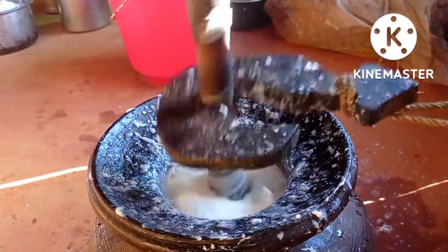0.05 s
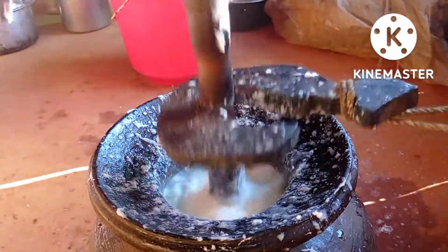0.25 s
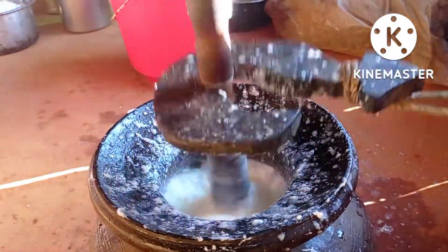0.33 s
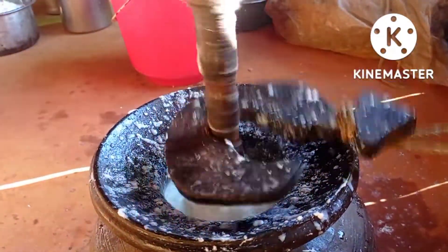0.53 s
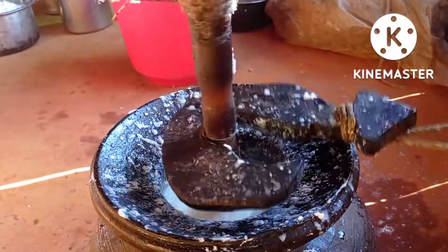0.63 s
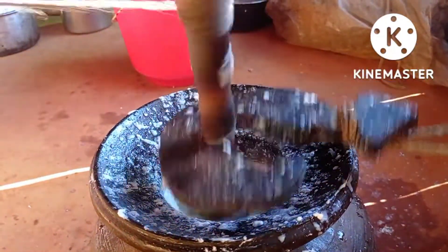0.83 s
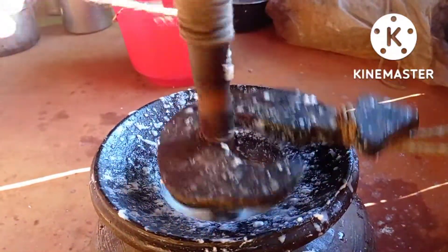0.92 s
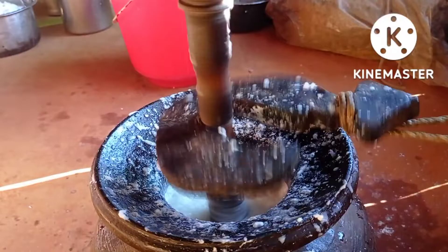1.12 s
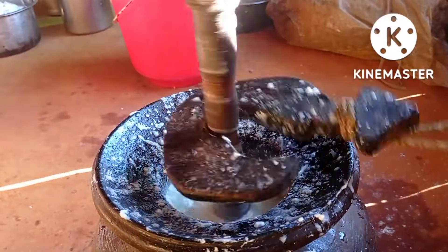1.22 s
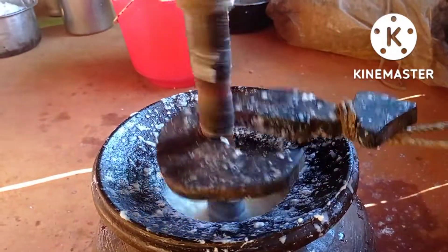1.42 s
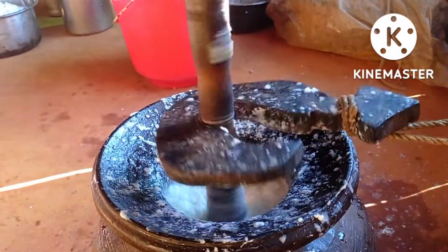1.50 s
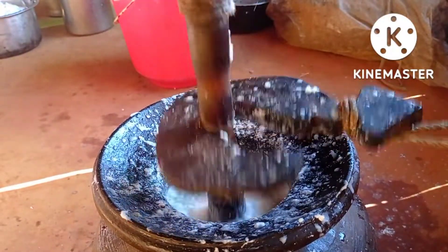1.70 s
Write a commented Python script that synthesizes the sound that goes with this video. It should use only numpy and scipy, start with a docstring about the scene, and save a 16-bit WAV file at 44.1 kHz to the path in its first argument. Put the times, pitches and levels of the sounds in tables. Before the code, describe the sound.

Thick liquid sloshing and gurgling as a wooden rod churns it, with occasional wooden knocks.

```python
"""Churning in a small room

One microphone, close to a pot where a wooden rod, spun to and fro by a rope, whips thick liquid.
Each stroke gurgles and hisses, throws liquid against the wall and leaves fat bubbles that plop.
The rod scrapes and knocks in its wooden guide; behind it the room answers briefly."""
import sys
import numpy as np
from scipy import signal
from scipy.io import wavfile
from scipy.ndimage import uniform_filter1d

SR = 44100
rng = np.random.default_rng(int(sys.argv[2]) if len(sys.argv) > 2 else 0)


def waveform_to_disk(signal):
    """Save audio, clipped to [-1, 1], as 16-bit WAV at the path in sys.argv[1]."""
    frames = np.transpose(np.atleast_2d(signal))
    scaled = np.clip(frames, -1, 1) * 32767
    samples = np.round(scaled).astype(np.int16)
    wavfile.write(sys.argv[1], SR, samples)


N = 77175
T = np.arange(N) / SR


# The effort of the strokes. Each row: time in seconds, level in dB.
CHURN_LEVEL = [(0, -44), (.04, -53), (.10, -52), (.18, -47.5), (.225, -43), (.29, -42.5), (.43, -47),
               (.51, -43.5), (.6, -43.5), (.745, -42.5), (.80, -50.5), (.86, -47), (.92, -41), (1.0, -37),
               (1.07, -40), (1.14, -48.5), (1.175, -51.5), (1.20, -44.5), (1.30, -43), (1.36, -34.5),
               (1.42, -43.5), (1.485, -41), (1.54, -56), (1.64, -45.5), (1.75, -41)]
# The gurgle from close by. Each row: frequency in Hz, relative gain in dB.
GURGLE_SPECTRUM = [(100, -45.5), (250, -17.5), (430, 0), (750, 0), (1000, -6), (1300, -17.5), (1800, -12.5),
                   (2600, -32), (6000, -33)]

def gurgle(per_s=900, spread_db=2.0, decay_cycles=1.37, sizes=24):
    """The paddle folds in many small, heavily damped bubbles, each size with its own pitch."""
    births = clicks(per_s, spread_db)
    size_index = rng.integers(0, sizes, N)
    out = np.zeros(N)
    for k, hz in enumerate(np.geomspace(250, 2200, sizes)):
        grain = bubble(hz, decay_cycles / hz) * (hz / 1000)
        out += signal.oaconvolve(births * (size_index == k), grain)[:N]
    return colour(out, GURGLE_SPECTRUM) * level(CHURN_LEVEL)


# Liquid thrown at the wall. Each row: start and length in seconds, slap and spray levels in dB.
SLOSHES = [(0.205, 0.03, -40.5, -53), (0.524, 0.0095, -37, -52), (.537, .016, -35, -43),
           (0.55, 0.014, -31, -32.5), (0.569, 0.023, -30.5, -33), (.591, 0.0072, -27, -29),
           (0.603, 0.0085, -29.5, -31), (0.623, 0.0062, -32, -40), (.644, 0.014, -26.5, -45),
           (0.933, 0.016, -43, -69), (1.02, .01, -37, -47.5), (1.3232, .012, -43.5, -41),
           (1.346, 0.027, -36, -54), (1.449, 0.0073, -34.5, -49), (1.473, 0.012, -40.5, -58)]
# The low slap and the bright spray. Each row: frequency in Hz, relative gain in dB.
SLAP_SPECTRUM = [(60, -21.5), (200, -9.5), (480, 6), (800, 5.5), (1300, -5), (1800, -4.5), (2300, -11.5),
                 (2600, -14.5), (3400, -23), (6000, -52)]
SPRAY_SPECTRUM = [(500, -12.5), (1500, -14), (2200, 9.5), (2600, -3), (3400, -0.5), (4700, -2), (6700, 0.5),
                  (8200, -10), (11000, -23.5), (13500, -35), (15200, -19)]
# The pot's ring. Each row: frequency in Hz, relative level in dB, seconds to fall 60 dB.
POT_MODES = [(490, -23, .12), (740, -17, .12), (945, -34, .1), (1766, 7, 0.1), (2240, -10, .14),
             (2790, -19, 0.14), (3580, 1, 0.18), (4930, 0, .1), (5820, -24, 0.09)]

def sloshes(rise_s=0.0035, fall_s=0.0087, ring_db=-48, dull_hz=7000, full_spray_db=-32):
    """Sheets of liquid slap the wall and break into drops, finer when thrown hard; the pot rings."""
    slap_env, spray_env = np.zeros((2, N))
    for start, length, slap_db, spray_db in SLOSHES:
        env = swell(start, rise_s, length, fall_s)
        slap_env = np.hypot(slap_env, env * amp(slap_db))
        spray_env = np.hypot(spray_env, env * amp(spray_db))
    drops = colour(clicks(per_s=7000, spread_db=2.0), SPRAY_SPECTRUM)
    coarse = signal.sosfiltfilt(signal.butter(2, dull_hz, fs=SR, output="sos"), drops)
    fineness = np.minimum(spray_env / amp(full_spray_db), 1) ** 2
    spray = spray_env * (coarse + fineness * (drops - coarse))
    slap = slap_env * colour(clicks(per_s=3000, spread_db=1), SLAP_SPECTRUM)
    splash = slap + spray
    return splash + amp(ring_db) * signal.fftconvolve(splash, ring(POT_MODES))[:N]


# Bubbles and drops. Each row: start in seconds, pitch in Hz, peak in dB, decay in seconds.
PLOPS = [(.001, 662, -33, 0.0021), (.062, 890, -39.5, 0.0021), (.123, 650, -50, 0.0051),
         (0.1553, 874, -34.5, 0.0012), (.198, 650, -38, 0.0016), (.341, 5470, -42.5, 0.0015),
         (.375, 770, -34, 0.0021), (.4665, 777, -31, 0.0011), (.5535, 4560, -30, 0.00046),
         (.561, 4500, -23, 0.00051), (.578, 680, -41, 0.0008), (.594, 858, -17.5, 0.0013),
         (.5975, 4600, -30, 0.001), (.695, 156, -34.5, 0.011), (.751, 630, -29, 0.0017),
         (.907, 894, -32, 0.0025), (.916, 810, -31, 0.00087), (.9215, 735, -22.5, .0012),
         (.935, 1160, -24.5, 0.00065), (.999, 850, -23, 0.00092), (1.0075, 670, -28, 0.0021),
         (1.186, 656, -35, 0.0013), (1.33, 166, -44.5, 0.013), (1.336, 560, -23, 0.0017),
         (1.365, 695, -21, 0.0017), (1.3775, 1030, -18.5, 0.00082), (1.448, 790, -24, 0.0027),
         (1.459, 650, -27.5, 0.0024), (1.625, 612, -36.5, 0.0027), (1.692, 4040, -37.5, 0.0011),
         (1.699, 706, -39, 0.0017), (1.716, 647, -30.5, 0.0012)]

def plops():
    """Single bubbles burst in the thick liquid, the largest with the lowest note."""
    out = np.zeros(N)
    for start, hz, db, decay_s in PLOPS:
        add(out, start, amp(db) * bubble(hz, decay_s))
    return out


# The paddle meets the surface. Each row: start in seconds, relative level in dB.
SMACKS = [(0.5525, -3.5), (1.0296, -4.5), (1.3254, -5), (1.4477, -3.5)]
# The tone of a smack. Each row: frequency in Hz, relative gain in dB.
SMACK_SPECTRUM = [(100, -7.5), (450, 2), (800, 6.5), (1200, -12), (1650, 6), (2500, -13.5), (2850, 0),
                  (3500, -22), (4700, -18), (7000, -20), (9000, -54), (13000, -57)]

def smacks(average_db=-50, decay_s=0.0026):
    """The paddle lands flat and wet: a sudden burst that dies in a few milliseconds."""
    env, t = np.zeros(N), T[:SR // 20]
    for start, db in SMACKS:
        add(env, start, amp(db) * np.exp(-t / decay_s))
    return amp(average_db) * colour(env * rng.standard_normal(N), SMACK_SPECTRUM)


# Bumps at the guide. Each row: start in seconds, gain in dB, thud pitch in Hz.
KNOCKS = [(0.3093, -19, 462), (.3180, -26.5, 316), (.6930, -22, 340), (0.7084, -37, 263),
          (1.0221, -14.5, 475), (1.0286, -10, 574), (1.061, -33, 283)]
# Pot and rod ringing. Each row: frequency in Hz, relative level in dB, seconds to fall 60 dB.
KNOCK_MODES = [(106, -28, 0.44), (149, -32.5, 0.068), (272, -15, 0.11), (479.6, -8.5, .07),
               (650, -22.5, .07), (984, -18, 0.11), (1790, -19.5, 0.027), (1940, -37, 0.064),
               (2170, -30.5, 0.063), (2300, -30, .08), (2720, -27, 0.028)]

def knocks(thud_db=-3, thud_s=0.0021, contact_s=0.00026):
    """The rod bumps its guide: a dull thud and a short wooden ring, softened by the wet contact."""
    out = np.zeros(N)
    for start, db, hz in KNOCKS:
        blow = ring(KNOCK_MODES)
        add(blow, 0, amp(thud_db) * bubble(hz, thud_s, glide_per_s=0))
        onset = 1 - np.exp(-T[:len(blow)] / contact_s)
        add(out, start, amp(db) * blow * onset)
    return high_pass(out, hz=92)


# The low surge in the pot. Each row: time in seconds, level in dB.
HEAVE_LEVEL = [(0, -48), (.1, -53.5), (.25, -46.5), (.36, -46.5), (.51, -57), (.58, -42), (.71, -41),
               (.85, -62.5), (.98, -48.5), (1.05, -38), (1.2, -69.5), (1.3, -53.5), (1.37, -48.5),
               (1.47, -49), (1.54, -66.5), (1.75, -47.5)]
# Its weight at close range. Each row: frequency in Hz, relative gain in dB.
HEAVE_SPECTRUM = [(20, -52), (38, -35), (52, -2), (80, -6), (108, 4.5), (160, 0.5), (270, -2), (400, -2),
                  (900, -57)]

def heave():
    """The mass of liquid shoves the pot."""
    return colour(clicks(per_s=1500, spread_db=7), HEAVE_SPECTRUM) * level(HEAVE_LEVEL)


# Resonances of the rod in its guide. Each row: frequency and width in Hz, relative level in dB.
SCRAPE_MODES = [(1122, 42, 0.5), (1474, 82, -2.5), (2093, 130, 3.5), (2230, 92, -8), (3410, 390, -3.5)]
SCRAPE_START_S, SCRAPE_RISE_S = 0.181, 0.053

def scrape(peak_db=-40.5, fall_s=0.087):
    """Wet wood slips on wood and excites a few narrow resonances."""
    t = T[:SR // 10]
    body = sum(amp(db) * np.sqrt(width) * np.exp(-np.pi * width * t) * np.sin(2 * np.pi * hz * t)
               for hz, width, db in SCRAPE_MODES)
    slips = clicks(per_s=1500, spread_db=0.5)
    env = swell(SCRAPE_START_S, SCRAPE_RISE_S, SCRAPE_RISE_S, fall_s)
    return amp(peak_db) * env * unit(signal.fftconvolve(slips, body)[:N])


# The shaft rubbing in its guide. Each row: time in seconds, level in dB.
RUB_LEVEL = [(0, -52), (.07, -64.5), (.10, -59.5), (.15, -54), (.24, -50.5), (.35, -53), (.42, -61.5),
             (.46, -62.5), (.52, -53), (.64, -50), (.72, -52.5), (.80, -63), (.92, -54), (1.03, -51),
             (1.15, -62), (1.22, -56.5), (1.36, -53), (1.52, -62.5), (1.62, -57), (1.75, -52)]
# Its hiss from close by. Each row: frequency in Hz, relative gain in dB.
RUB_SPECTRUM = [(500, -26), (1200, 5), (1800, 3.5), (2600, 1.5), (3500, 0), (5400, -2), (6600, 3.5),
                (8000, -12.5), (11000, -24), (13500, -43), (15200, -21)]

def rub(hiss_gain=0.99):
    """The shaft rubs in its guide: fine crackle over a smooth hiss."""
    fizz = clicks(per_s=2500, spread_db=5) + hiss_gain * rng.standard_normal(N)
    return colour(fizz, RUB_SPECTRUM) * level(RUB_LEVEL)


def shaft_tone(hz=2038, width_hz=86, peak_db=-49.5, fall_s=0.14):
    """Friction makes the shaft sing faintly: a narrow tone that rises with the scrape and outlasts it."""
    t = T[:SR // 10]
    mode = np.exp(-np.pi * width_hz * t) * t * np.sin(2 * np.pi * hz * t)
    env = swell(SCRAPE_START_S, SCRAPE_RISE_S, SCRAPE_RISE_S, fall_s)
    return amp(peak_db) * env * unit(signal.fftconvolve(rng.standard_normal(N), mode)[:N])


# Flung droplets land. Each row: start in seconds, level in dB.
DROPLETS = [(0.3423, -51), (0.96, -52), (.989, -47), (1.52, -43.5)]
# Their thin tick. Each row: frequency in Hz, relative gain in dB.
DROPLET_SPECTRUM = [(2000, -28), (5500, -4), (8200, -2), (10800, -8), (13000, -10), (15000, -10.5)]

def droplets(decay_s=0.00087):
    """Tiny drops spatter on the rim."""
    env, t = np.zeros(N), T[:SR // 50]
    for start, db in DROPLETS:
        add(env, start, amp(db) * np.exp(-t / decay_s))
    return env * colour(rng.standard_normal(N), DROPLET_SPECTRUM)


# The small room around the pot. Each row: frequency in Hz, seconds to fall 60 dB.
ROOM_DECAY = [(100, 0.2), (1000, 0.21), (8000, 0.22)]

def room(x, gap_s=0.004):
    """Nearby walls send a short diffuse tail back to the microphone."""
    noise = rng.standard_normal(SR // 2) * (T[:SR // 2] > gap_s)
    hz, t, bands = signal.stft(noise, SR, nperseg=256)
    fade = amp(-60 * t / value_at(ROOM_DECAY, hz)[:, None])
    tail = signal.istft(bands * fade, SR, nperseg=256)[1]
    return signal.fftconvolve(x, tail / np.linalg.norm(tail))[:N]


def bubble(hz, decay_s, glide_per_s=22.5):
    """A soft-starting, quickly damped tone whose pitch may rise."""
    t = np.arange(0, 10 * decay_s, 1 / SR)
    env = np.sqrt(2 * np.e * t / decay_s) * np.exp(-t / decay_s)
    return env * np.sin(2 * np.pi * hz * t * (1 + glide_per_s * t / 2))


def clicks(per_s, spread_db):
    """Random clicks of uneven size, with a steady mean power."""
    size = amp(spread_db * np.minimum(rng.exponential(1, N), 3))
    train = size * rng.choice([-1, 1], N) * (rng.random(N) < per_s / SR)
    local_power = abs(uniform_filter1d(train ** 2, size=1100))
    return train / np.sqrt(local_power + per_s / SR / 10)


def ring(modes):
    """A struck body sounds as a sum of dying modes."""
    t = T[:SR // 2]
    return sum(amp(db - 60 * t / t60) * np.sin(2 * np.pi * hz * t) for hz, db, t60 in modes)


def swell(start, rise_s, length_s, fall_s):
    """Ramps up, holds until length_s after the start, then dies away."""
    age = T - start
    return np.clip(age / rise_s, 0, 1) * np.exp(-np.maximum(age - length_s, 0) / fall_s)


def colour(x, spectrum):
    """Shapes x with a minimum-phase filter and scales it to rms 1."""
    hz = abs(np.fft.fftfreq(4096, 1 / SR))
    log_gain = np.log(amp(value_at(spectrum, hz)))
    response = np.exp(np.conj(signal.hilbert(log_gain)))
    taps = np.fft.ifft(response).real[:2048]
    return unit(signal.fftconvolve(x, taps)[:N])


def value_at(points, hz):
    """Interpolates a table along log frequency."""
    freqs, values = np.transpose(points)
    return np.interp(np.log(hz + 1), np.log(freqs + 1), values)


def level(points):
    """Gain over time from points in seconds and dB."""
    return amp(np.interp(T, *np.transpose(points)))


def amp(db):
    """Decibels to gain."""
    return 10 ** (np.asarray(db) / 20)


def unit(x):
    """Scales to rms 1."""
    return x / np.sqrt(np.mean(x ** 2) + 1e-20)


def add(mix, start, sound):
    """Mixes a sound in at start seconds."""
    part = mix[max(round(start * SR), 0):][:len(sound)]
    part += sound[:len(part)]


def high_pass(x, hz):
    """Rolls off the bass under hz."""
    return signal.sosfilt(signal.butter(4, hz, "highpass", fs=SR, output="sos"), x)


def scene(room_db=-11):
    """The churn up close in mono, with the room well behind it."""
    liquid = gurgle() + rub() + heave() + sloshes() + smacks() + plops() + droplets()
    direct = liquid + knocks() + scrape() + shaft_tone()
    return (direct + amp(room_db) * room(direct))[None]


def record(dry, bass_cut_hz=43, top_hz=15800):
    """The microphone's bass roll-off and the recorder's band limit."""
    band_limit = signal.firwin(511, top_hz, window=("kaiser", 9), fs=SR)
    return signal.oaconvolve(high_pass(dry, bass_cut_hz), band_limit[None], "same")


dry = scene()
out = record(dry)
waveform_to_disk(out)
```